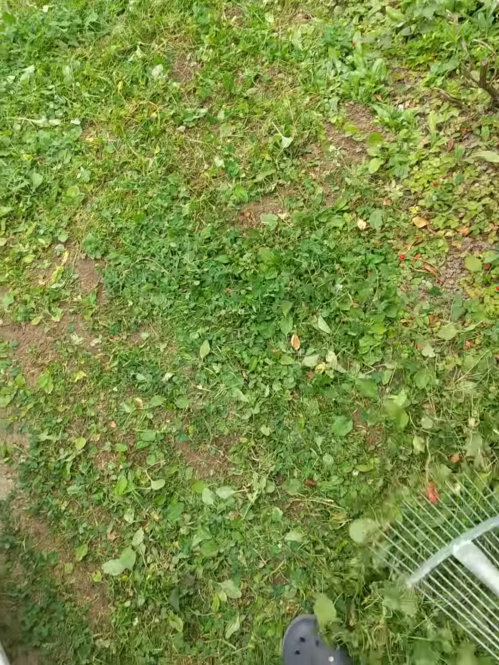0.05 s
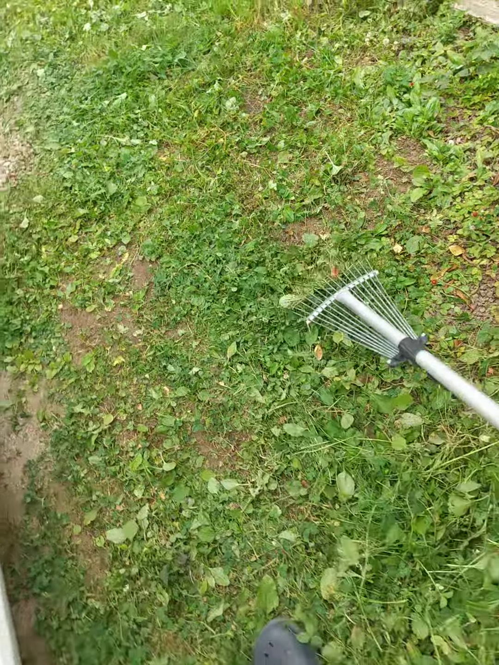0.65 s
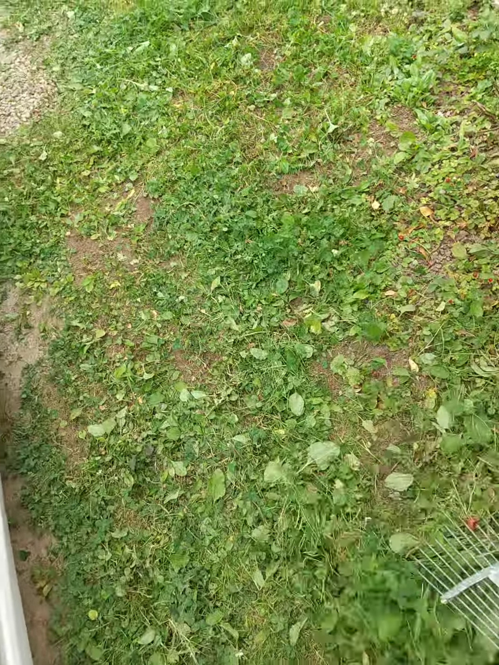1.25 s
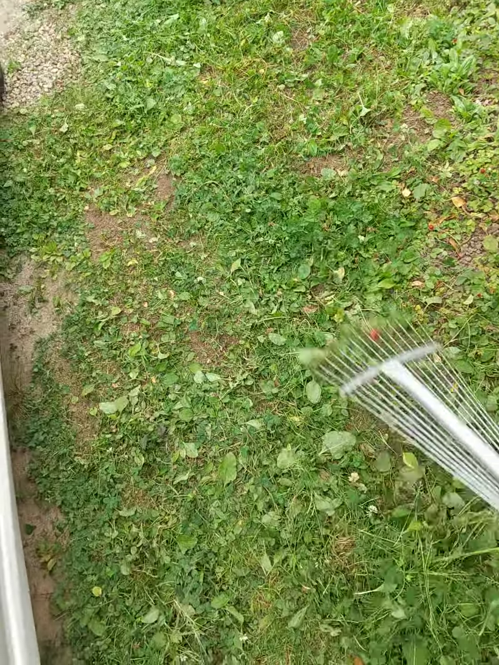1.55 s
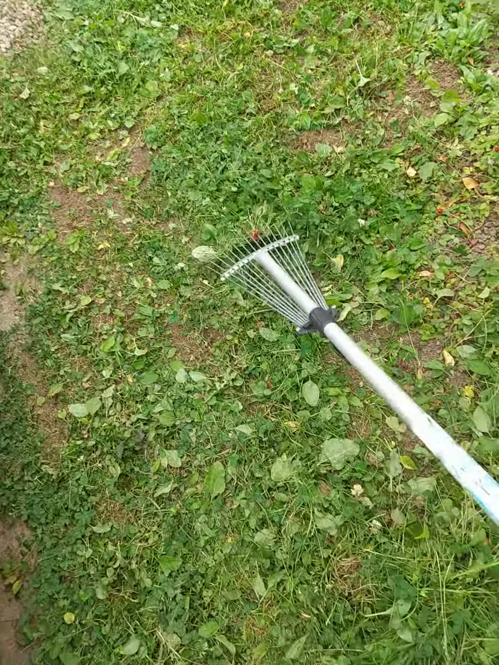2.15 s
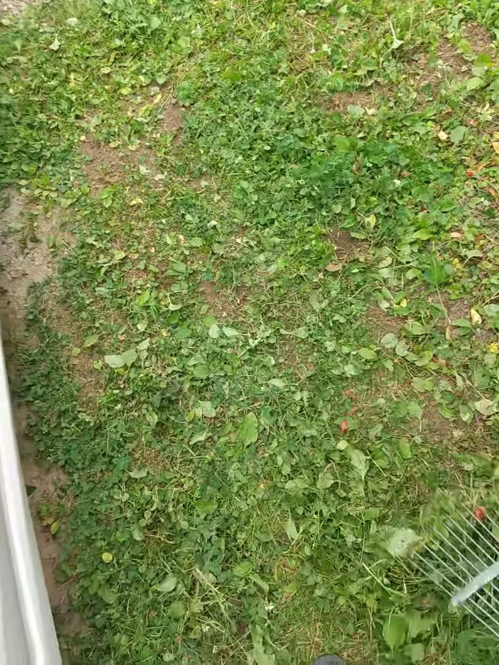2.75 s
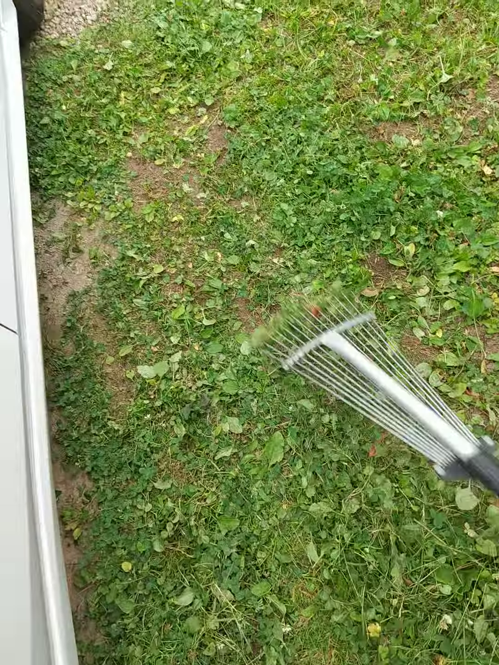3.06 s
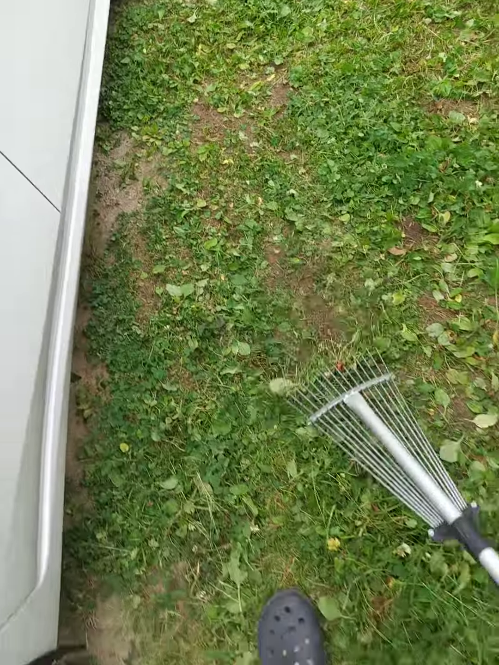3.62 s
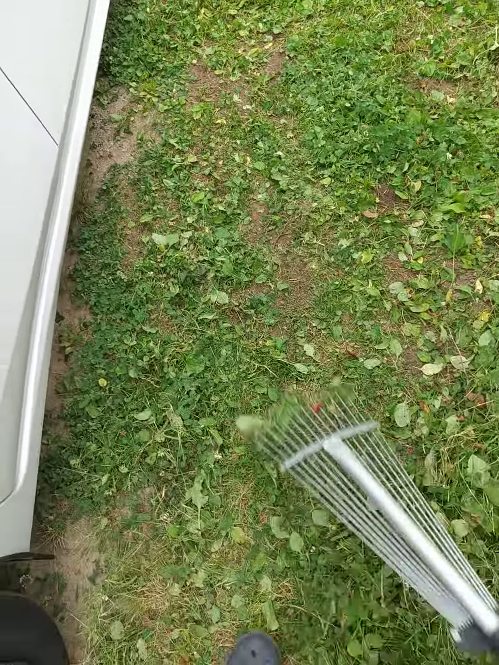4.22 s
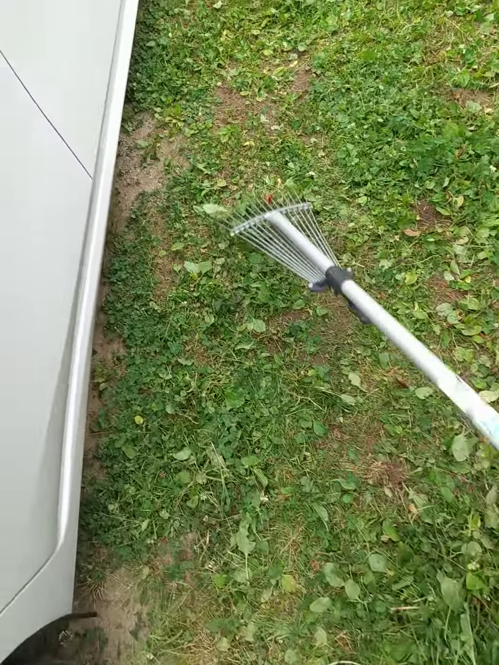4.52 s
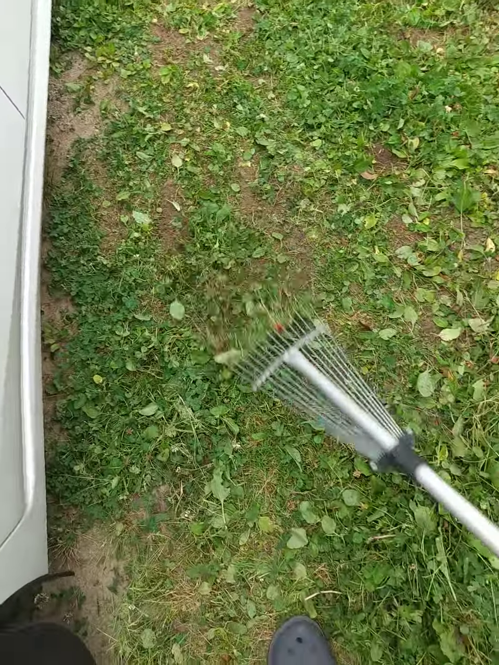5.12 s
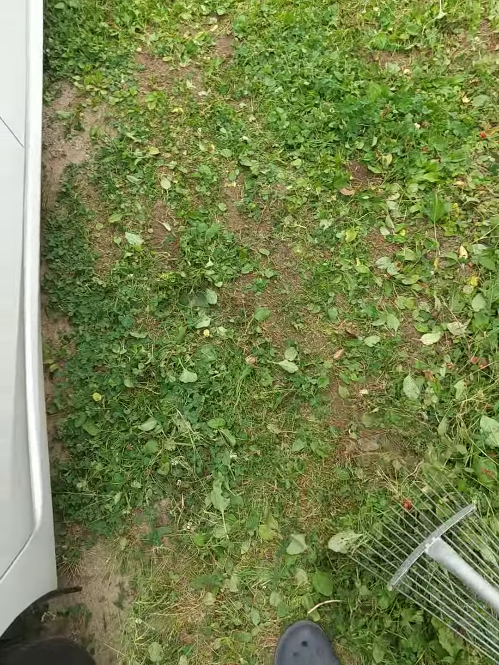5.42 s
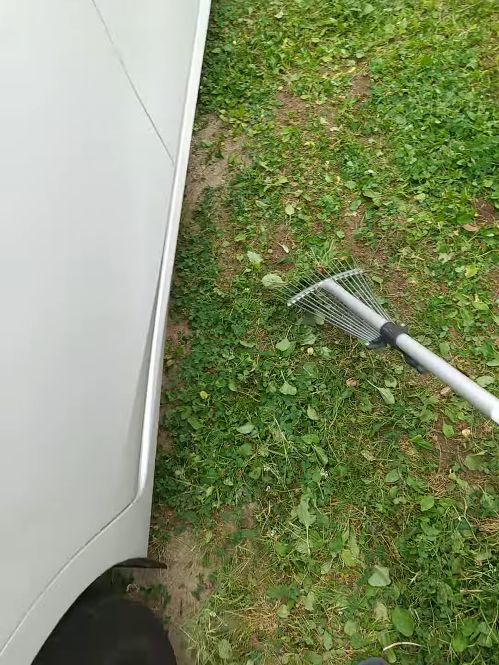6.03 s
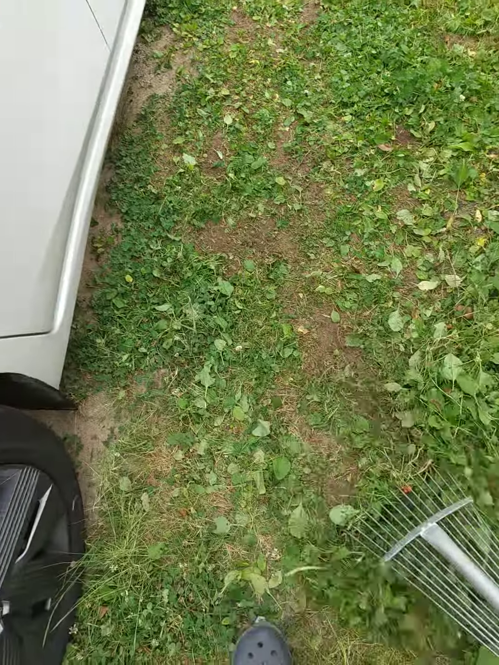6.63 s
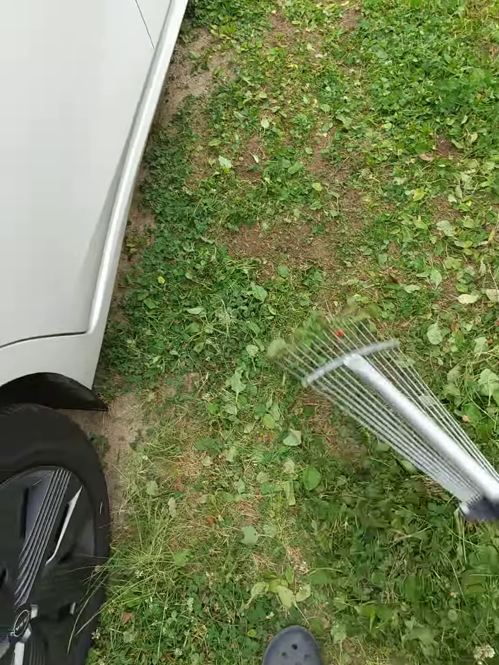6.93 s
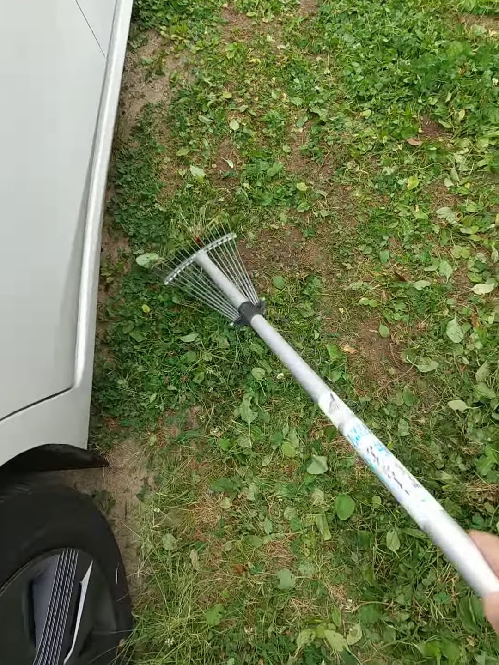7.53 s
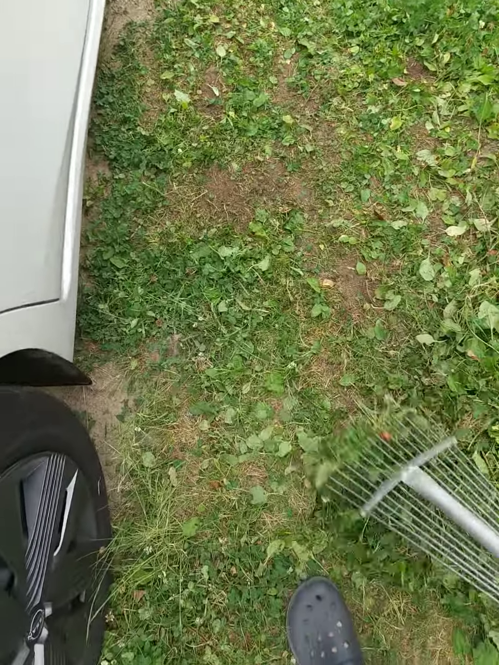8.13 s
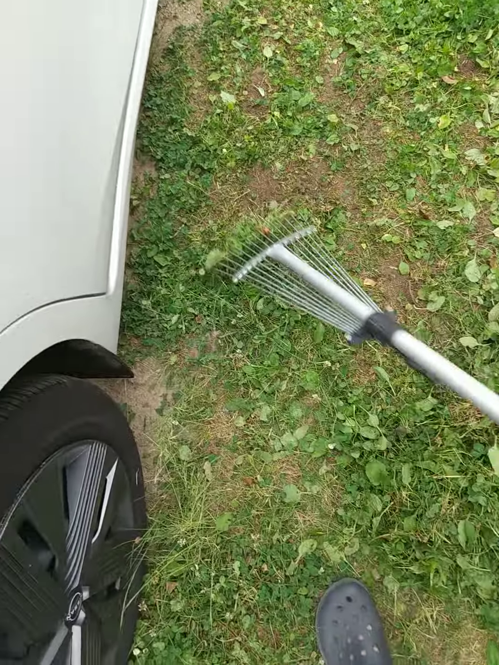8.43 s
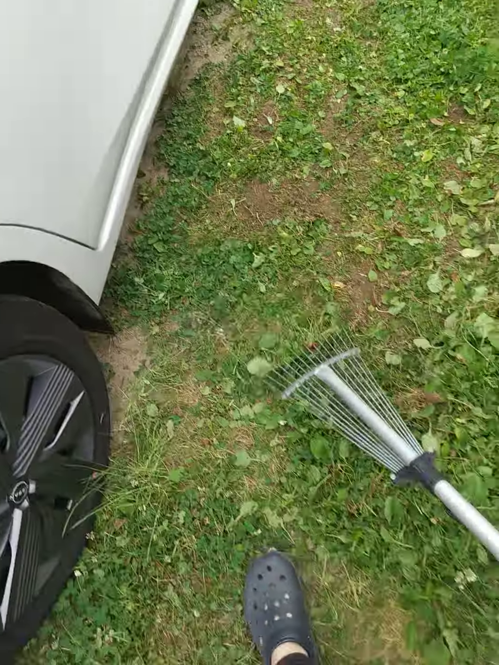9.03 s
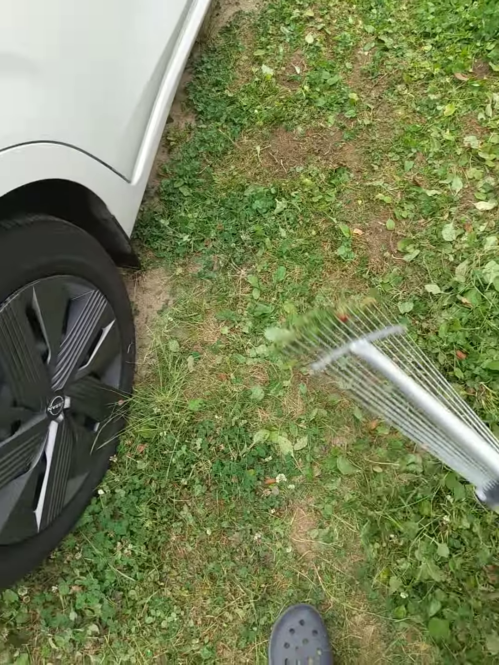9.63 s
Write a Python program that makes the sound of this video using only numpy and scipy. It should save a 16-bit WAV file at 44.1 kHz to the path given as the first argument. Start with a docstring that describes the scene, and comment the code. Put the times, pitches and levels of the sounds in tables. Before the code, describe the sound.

A metal fan rake is pulled through cut grass and weeds seven times, close to the microphone, with brief lulls between strokes. Each pull is a bright, crunchy scrape: wire tines tick and ring lightly, stems tear and rustle, and soil rasps beneath. A soft low thump comes just past the middle and a few more near the end. Faint garden air and a distant rumble lie behind.

```python
"""A quiet garden: a wire fan rake is pulled seven times through cut grass and weeds.
The tines land, catch and slip in flurries of tiny ticks that ring the fan; stems tear and rustle,
dry stalks snap and the soil scrapes under them. A few soft thumps sound as the gardener shifts about.
A distant rumble and faint garden air lie behind it all."""
import sys
import numpy as np
from scipy import signal
from scipy.fft import rfft, irfft, next_fast_len
from scipy.io import wavfile
from scipy.ndimage import uniform_filter1d

SR = 44100
rng = np.random.default_rng(int(sys.argv[2]) if len(sys.argv) > 2 else 0)


def bounce(signal):
    """Save signal as a 16-bit WAV file at the path given by the first command-line argument."""
    frames = np.transpose(np.atleast_2d(signal))
    limited = np.clip(frames, -1, 1)
    pcm = np.round(limited * 32767).astype(np.int16)
    wavfile.write(sys.argv[1], SR, pcm)


N = 430857
TIME_S = np.arange(N) / SR


def from_db(db):
    """Decibels to gain."""
    return 10 ** (np.asarray(db) / 20)


def gain_at(spectrum, hz):
    """Gain of a spectrum, interpolated over log frequency."""
    knots_hz, db = np.transpose(spectrum)
    return from_db(np.interp(np.log(hz + 1), np.log(knots_hz), db))


def unit_rms(x):
    """Scale to rms 1."""
    return x / np.sqrt(np.mean(x ** 2) + 1e-20)


def drift(rate_hz):
    """Random wander, rms 1."""
    knots = rng.standard_normal(int(N / SR * rate_hz) + 2)
    return unit_rms(np.interp(TIME_S * rate_hz, np.arange(len(knots)), knots))


# Stereo width: f/Hz, side over mid/dB
STEREO_WIDTH = [(3000, -101), (6000, -12), (9000, -9.5), (13000, -6.5)]

def coloured_noise(spectrum, size=N):
    """Stereo noise, wider in the treble, rms 1."""
    fft_size = next_fast_len(size)
    hz = np.arange(fft_size // 2 + 1) * SR / fft_size
    mid, side = rfft(rng.standard_normal((2, fft_size))) * gain_at(spectrum, hz)
    side = side * gain_at(STEREO_WIDTH, hz)
    return unit_rms(irfft(np.array([mid + side, mid - side]), fft_size)[:, :size])


# Tine bites, several per pull: t/s, swell/s, length/s, level/dB, sag/dB, brightness/dB, soil re drag/dB
GRASS_BITES = [ (0.019, .004, 0.029, -41, 8, -2, -12.5), (0.674, 0.0067, 0.16, -30.5, 14, -2.5, -10.5),
               (0.839, 0.088, 0.22, -34, 11.5, -2.5, -10.5), (0.999, 0.046, .16, -29.5, 9.5, -1, -12),
               (2.186, 0.016, 0.02, -21.5, -1.5, -2.5, -11), (2.217, .04, 0.087, -26.5, 12, 0, -13.5),
               (2.34, 0.012, .015, -33, 0, -2, -11), (2.353, 0.0087, 0.13, -24, 14, -1.5, -13.5),
               (2.497, 0.026, 0.063, -20, 10, 1, -14.5), (2.565, 0.0091, .04, -36.5, 2, -3, -13),
               (2.608, 0.016, 0.043, -19, 7, -0.5, -14.5), (2.664, .005, 0.16, -40.5, 19, -1.5, -10.5),
               (3.379, 0.019, 0.067, -37.5, 2, -2, -11.5), (3.455, .006, 0.036, -37, 8, -2, -12.5),
               (3.553, 0.018, 0.073, -27, 4, 3, -15), (3.649, 0.067, 0.085, -27, 3.5, 1, -15.5),
               (3.744, 0.0088, 0.21, -39, 8.5, -2.5, -11.5), (4.822, 0.076, 0.09, -32.5, 8, -4, -12),
               (4.968, .016, 0.025, -32, -5, -3.5, -10.5), (4.992, 0.019, 0.077, -23, 13.5, -1, -13.5),
               (5.072, 0.0047, 0.076, -24, 13, 2, -13.5), (5.123, 0.028, 0.075, -32, 2.5, -1, -17.5),
               (5.212, 0.05, 0.087, -16, 8, 5, -15), (5.328, .012, 0.1, -28, 1, -1.5, -13.5),
               (5.409, 0.0069, 0.085, -20.5, 7.5, 0, -18.5), (5.506, 0.029, 0.024, -32, 1, -2.5, -17),
               (6.009, 0.035, 0.091, -30, 2.5, -2.5, -12.5), (6.127, 0.027, 0.1, -32.5, 8.5, -1.5, -10.5),
               (6.247, 0.057, 0.071, -28.5, 2.5, 0, -10.5), (6.331, 0.057, 0.13, -23.5, 13.5, 2, -14.5),
               (6.465, 0.025, .13, -30.5, 10.5, -2, -12), (6.588, .005, .06, -43.5, 11, -5, -7.5),
               (6.653, .017, 0.029, -43, 3, -3.5, -13), (7.552, 0.0081, 0.13, -29.5, 14, -3, -10),
               (7.682, 0.011, 0.11, -24.5, 7, -4, -14), (7.806, 0.0063, 0.083, -29.5, 1.5, -2, -17),
               (7.908, 0.018, 0.14, -31, 1, -2, -15.5), (8.06, 0.024, 0.055, -25, 5.5, 2, -15.5),
               (8.689, 0.011, 0.072, -37, 9, -1.5, -12), (8.753, 0.0053, 0.058, -31.5, 5, -1.5, -14),
               (8.824, 0.006, 0.11, -28, 15, -2, -12.5), (8.945, 0.05, 0.08, -31, 5, -2.5, -10.5),
               (9.036, 0.014, 0.052, -29, 10, -4, -14.5), (9.093, .005, .035, -48.5, -3, -2.5, -9),
               (9.134, 0.077, 0.1, -27.5, 6.5, -1, -13.5), (9.245, .005, .095, -46, 7, -6.5, -7),
               (9.342, .007, 0.024, -39, 8.5, -3, -12)]

def pulls(grass_db, onset_db=-7, release_db_per_s=746, firm_db=-28, soil_db_per_db=-0.04):
    """Drag gain, brightness and soil share: each bite swells, sags and lets go; the strongest leads."""
    drag_db = grass_db.copy()
    bright_db, soil_db = np.full(N, -3.0), np.full(N, -6.5)
    for start_s, swell_s, length_s, db, sag_db, bite_bright_db, bite_soil_db in GRASS_BITES:
        span = slice(int(start_s * SR), int((start_s + length_s) * SR) + SR // 10)
        age_s = TIME_S[span] - start_s
        bite_db = db + np.interp(age_s, [0, swell_s, max(length_s, swell_s)], [onset_db, 0, -sag_db])
        bite_db -= release_db_per_s * np.maximum(age_s - length_s, 0)
        leads = bite_db > drag_db[span]
        drag_db[span][leads] = bite_db[leads]
        bright_db[span][leads] = bite_bright_db
        soil_db[span][leads] = bite_soil_db
    soil_db += soil_db_per_db * (drag_db - firm_db)  # hard pulls raise tines more than soil
    return from_db(drag_db), uniform_filter1d(bright_db, size=200), soil_db


def slips(drag, base_per_s, spread_db, judder_db=3.5, judder_hz=110, smooth_s=0.024):
    """Stick-slip clicks, denser under a harder pull, bunched by fan judder; power near 1."""
    rate_per_s = base_per_s * (drag / drag.max() * 10 + 0.2) ** 0.32
    sizes = from_db(spread_db * np.minimum(rng.exponential(1, N), 4) + judder_db * drift(judder_hz))
    clicks = (rng.random(N) < rate_per_s / SR) * sizes * rng.choice([-1, 1], N)
    power = np.abs(uniform_filter1d(clicks ** 2, int(smooth_s * SR)))
    return clicks / np.sqrt(power + 1e-4)


# Snagged tines springing free: t/s, level/dB
TINE_SNAGS = [(0.0216, -27), (0.072, -36), (0.39, -42), (0.5863, -31.5), (0.6044, -32.5), (0.6971, -12.5),
              (0.7224, -18.5), (1.0083, -9.5), (1.043, -18), (1.277, -33.5), (1.801, -44.5), (2.085, -34.5),
              (2.157, -35.5), (2.1902, -17), (2.2042, -8), (2.434, -27), (2.4985, -16), (2.612, -10.5),
              (2.6872, -24), (2.765, -23.5), (2.784, -26), (3.4042, -28), (3.5729, -10.5), (3.6514, -14),
              (3.678, -12.5), (3.723, -12), (3.9646, -21), (4.7104, -25), (5.0207, -18.5), (5.0776, -12),
              (5.259, -7), (5.4138, -5.5), (5.451, -7.5), (5.4814, -11), (5.5177, -18), (5.828, -29.5),
              (5.885, -42), (5.9746, -34.5), (6.035, -14.5), (6.0578, -15), (6.1704, -16.5),
              (6.2591, -16.5), (6.4618, -11.5), (6.496, -7), (6.5626, -20.5), (6.7358, -33), (7.52, -34),
              (7.5597, -24), (7.7108, -10), (7.7472, -11.5), (7.8208, -11.5), (7.9497, -9.5), (7.9864, -16),
              (8.5986, -29.5), (8.618, -31.5), (8.8288, -17), (8.99, -8.5), (9.0001, -13.5), (9.1344, -14),
              (9.1546, -14.5), (9.344, -37)]

def snags(gain_db=8.5, chatter_s=0.0037, rebounds=4):
    """A freed tine strikes once, then chatters against its neighbours."""
    clicks = np.zeros(N)
    for (start_s, db), lateness in zip(TINE_SNAGS, rng.random((len(TINE_SNAGS), rebounds))):
        clicks[int(start_s * SR)] += from_db(db + gain_db)
        rebound_at = ((start_s + chatter_s * lateness) * SR).astype(int)
        clicks[rebound_at] += from_db(db + gain_db - 2.5 * (1.5 + lateness))
    return clicks


# Wire fan resonances: f/Hz, width/Hz, level/dB
FAN_MODES = [(1450, 398, -8), (2720, 310, -1.5), (3580, 230, 2), (4125, 430, -8.5), (5092, 400, 0),
             (5610, 483, 1), (7450, 280, 2.5), (8000, 493, 3.5), (8420, 436, -0.5), (9250, 415, 4)]
# Crunch of tines and grass: f/Hz, level/dB
CRUNCH_SPECTRUM = [(1200, -23.5), (2200, -21), (3000, 5.5), (4500, 6.5), (5600, -1), (6400, 3.5),
                   (8300, 1.5), (9500, 4.5), (10400, -6), (11800, 4), (14200, 0.5)]

def tine(ring_t60_s=0.062, crunch_t60_s=0.017, scatter_t60_s=0.15, scatter_db=-22, cluster=4):
    """Impulse response of one wire: crunch, its own mix of fan modes, faint scatter from nearby."""
    size = SR // 8
    t = np.arange(size) / SR
    centre_hz, width_hz, db = np.repeat(FAN_MODES, cluster, axis=0).T
    hz = centre_hz + width_hz * rng.uniform(-0.598, 0.553, len(centre_hz))
    db = db + np.repeat(rng.uniform(-13.5, 10, len(FAN_MODES)), cluster)
    gains = from_db(db) * np.sqrt(width_hz) * rng.choice([-1, 1], len(hz))
    skew_rad = (gain_at(STEREO_WIDTH, centre_hz) * rng.standard_normal(len(hz)))[:, None]
    ring = np.array([gains @ np.sin(2 * np.pi * hz[:, None] * t + ear * skew_rad) for ear in (1, -1)])
    ring = unit_rms(ring * from_db(-60 * t / ring_t60_s))
    decay = from_db(-60 * t / crunch_t60_s) + from_db(scatter_db - 60 * t / scatter_t60_s)
    crunch = unit_rms(coloured_noise(CRUNCH_SPECTRUM, size) * decay)
    return unit_rms(crunch + ring) / np.sqrt(size)


def stem(t60_s=0.003):
    """Impulse response of a tearing stem: one short, bright crack."""
    size = SR // 100
    crack = coloured_noise(CRUNCH_SPECTRUM, size) * from_db(-60 * np.arange(size) / SR / t60_s)
    return unit_rms(crack) / np.sqrt(size)


def strike(clicks, response, bodies):
    """Each click excites one of several unlike bodies."""
    target = rng.integers(0, bodies, N)
    return sum(signal.oaconvolve((clicks * (target == body))[None], response(), axes=1)[:, :N]
               for body in range(bodies))


def rustle(drag, gain_db=-9.5):
    """Dragged leaves hiss with the pull."""
    return from_db(gain_db) * drag * coloured_noise(CRUNCH_SPECTRUM)


def brighten(x, bright_db, split_hz=6500):
    """Fast slips favour the treble, heavy landings the lower resonances."""
    low = signal.sosfiltfilt(signal.butter(2, split_hz, fs=SR, output="sos"), x)
    treble_share = np.clip(from_db(bright_db) ** 2, 0.1, 0.8)
    return low * np.sqrt(2 * (1 - treble_share)) + (x - low) * np.sqrt(2 * treble_share)


# Scraped earth: f/Hz, level/dB
SOIL_SPECTRUM = [(90, -8.5), (170, -12.5), (280, -9), (400, -10.5), (600, -8), (850, -6.5), (1150, -1.5),
                 (1500, -1.5), (1850, -5), (2300, -6), (3200, -19.5)]

def soil(clicks, crumble_s=0.0047):
    """Each contact crumbles the earth: a dull puff of grit."""
    pole = np.exp(-1 / (crumble_s * SR))
    power = signal.lfilter([1 - pole], [1, -pole], clicks ** 2 + 1e-18)
    return np.sqrt(power) * coloured_noise(SOIL_SPECTRUM)


def ground_echo(x, gain=0.29, delay_s=0.001104, swing=0.3006):
    """Ground reflection; its delay wanders as the fan moves and flexes."""
    samples = np.arange(N)
    lag = delay_s * SR * np.exp(swing * drift(4))
    echo = np.array([np.interp(samples - lag, samples, channel) for channel in x])
    return (x + gain * echo) / np.sqrt(1 + gain ** 2)


def pings(events, gain_db, t60_s, spread, modes=5):
    """Each impact rings a few close modes around its pitch."""
    out, t = np.zeros(N), np.arange(SR // 5) / SR
    for start_s, db, hz in events:
        detune, phase = rng.uniform(-0.97, 1, (2, modes))
        partials = np.sin(2 * np.pi * np.outer(t, hz * (1 + spread * detune)) + np.pi * phase)
        ring = partials.sum(1) * from_db(-60 * t / t60_s)
        at = int(start_s * SR)
        out[at:at + len(t)] += from_db(db + gain_db) * ring / np.abs(ring).max()
    return out


# Fan landings: t/s, level/dB
FAN_CLANKS = [(0.687, -26.5), (0.7216, -28), (2.1898, -26), (2.208, -23), (2.251, -27), (3.404, -37),
              (3.5715, -38), (4.834, -35), (4.9763, -31), (5, -25), (6.0342, -28), (6.059, -28),
              (6.1713, -31.5), (7.5203, -44), (7.5597, -41), (8.6988, -38)]

def clanks(mode_hz=2840):
    """The whole fan lands and rings in a low wire mode."""
    landings = [(start_s, db, mode_hz) for start_s, db in FAN_CLANKS]
    return pings(landings, gain_db=-0.5, t60_s=0.075, spread=0.069)


# Breaking stalks: t/s, level/dB, f/Hz
STALK_SNAPS = [(0.2344, -44, 1390), (1.042, -29, 1620), (1.066, -30, 1460), (4.3672, -36, 1190),
               (8.1627, -42, 1210)]

def snaps():
    """Dry stalks snap with a brief ring."""
    return pings(STALK_SNAPS, gain_db=-3.5, t60_s=0.046, spread=0.22)


# Grass settling, at the start and as each pull ends: t/s, level/dB
GRASS_SETTLES = [(0.0, -53.5), (1.16, -50.5), (2.66, -56.5), (3.93, -53.5), (5.53, -68), (6.6, -57),
                 (8.12, -68), (9.25, -50)]
# Empty fan brushing the grass tips: t/s, level/dB
GRASS_BRUSHES = [(0.43, -58), (2.98, -60), (4.3, -59.5), (6.99, -59.5), (8.37, -66.5), (9.54, -53.5)]

def loose_grass_db(settle_db_per_s=32.5, brush_db_per_s=92):
    """Loose grass comes to rest after each pull and stirs as the fan swings out over it."""
    resting = [np.where(TIME_S >= start_s, db - settle_db_per_s * (TIME_S - start_s), -100)
               for start_s, db in GRASS_SETTLES]
    stirred = [db - brush_db_per_s * np.abs(TIME_S - peak_s) for peak_s, db in GRASS_BRUSHES]
    return np.max(resting + stirred, axis=0)


def wire_mode(x, hz, width_hz):
    """One resonance driven by x, rms 1."""
    return unit_rms(signal.lfilter(*signal.iirpeak(hz, hz / width_hz, fs=SR), x))


def rasp(drag, gain_db=-7, slope_db_per_s=34):
    """Slipping wires rasp, most at the end of a pull when the rake is close."""
    from_end_s = np.min([np.abs(end_s - TIME_S) for end_s, _ in GRASS_SETTLES], axis=0)
    grain = wire_mode(slips(drag, base_per_s=900, spread_db=6.0), hz=5500, width_hz=840)
    return drag * from_db(gain_db - slope_db_per_s * from_end_s) * grain


def quiver(grass_db, gain_db=-12.5):
    """The lifted wires shimmer in one narrow mode, fading with the rustle."""
    return from_db(grass_db + gain_db) * wire_mode(rng.standard_normal(N), hz=3530, width_hz=210)


def stray_ticks(rate_per_s=11, level_db=-50, spread_db=4):
    """Bent blades spring back at random moments."""
    return (rng.random(N) < rate_per_s / SR) * from_db(level_db + spread_db * rng.standard_normal(N))


# Feet and hands: t/s, level/dB, f/Hz
BODY_THUMPS = [(1.716, -43.5, 155), (6.279, -31, 213), (9.407, -36, 94), (9.428, -30, 113),
               (9.461, -41, 68), (9.563, -34.5, 68)]

def thumps(rise_cycles=0.65):
    """The gardener shifts; each thump swells and dies in about three cycles."""
    out, t = np.zeros(N), np.arange(SR // 8) / SR
    for start_s, db, hz in BODY_THUMPS:
        age = t * hz / rise_cycles
        envelope = (age * np.exp(1 - age)) ** 2
        at = int(start_s * SR)
        out[at:at + len(t)] += from_db(db) * envelope * np.sin(2 * np.pi * hz * t)
    return out


# Rumble envelope: t/s, level/dB
RUMBLE_LEVELS = [(0, -57), (2.3, -58.5), (3.6, -59.5), (5.7, -60.5), (6.3, -54.5), (7.1, -57.5),
                 (7.8, -52.5), (8.4, -59), (8.9, -53), (9.7, -53)]
# Rumble colour: f/Hz, level/dB
RUMBLE_SPECTRUM = [(22, -25), (34, -17), (45, -3.5), (62, 0), (85, -5), (130, -13.5), (220, -21),
                   (500, -50)]

def rumble():
    """Distant low noise, slowly swelling and ebbing."""
    return from_db(np.interp(TIME_S, *np.transpose(RUMBLE_LEVELS))) * coloured_noise(RUMBLE_SPECTRUM)


# Garden air: f/Hz, level/dB
AIR_SPECTRUM = [(30, -22), (70, -1), (200, 0), (400, -5.5), (750, -5.5), (1500, -11), (2700, -18),
                (3500, -15.5), (7000, -20), (9100, -17), (10200, -23.5), (14000, -22)]

def garden_air(level_db=-58):
    """Faint, steady outdoor noise."""
    return from_db(level_db) * coloured_noise(AIR_SPECTRUM)


def scene():
    """The pull drives tines, stems and soil together, over thumps, rumble and garden air."""
    grass_db = loose_grass_db()
    drag, bright_db, soil_db = pulls(grass_db)
    slipping = drag * slips(drag, base_per_s=800, spread_db=2.5)
    snagging = snags()
    tearing = drag * slips(drag, base_per_s=450, spread_db=5.0)
    tines = strike(from_db(-0.5) * slipping + snagging + stray_ticks(), tine, bodies=22)
    stems = strike(from_db(-10.5) * tearing + from_db(-11.5) * snagging, stem, bodies=10)
    crunch = brighten(tines + stems + rustle(drag), bright_db)
    earth = soil(from_db(soil_db) * slipping + from_db(-14.5) * snagging)
    impacts = clanks() + snaps()
    rake = ground_echo(crunch + earth + rasp(drag)) + impacts + quiver(grass_db)
    return rake + thumps() + rumble() + garden_air()


def record(dry, low_cut_hz=36, mono_below_hz=3400, high_cut_hz=14350):
    """Mono below the treble; deep bass and top cut."""
    mid, side = dry.mean(0), (dry[0] - dry[1]) / 2
    side = signal.sosfilt(signal.butter(8, mono_below_hz, "high", fs=SR, output="sos"), side)
    mid = signal.sosfilt(signal.butter(4, low_cut_hz, "high", fs=SR, output="sos"), mid)
    high_cut = signal.ellip(10, 0.2, 70, high_cut_hz, fs=SR, output="sos")
    return signal.sosfilt(high_cut, np.array([mid + side, mid - side]))


dry = scene()
out = record(dry)
bounce(out)
```